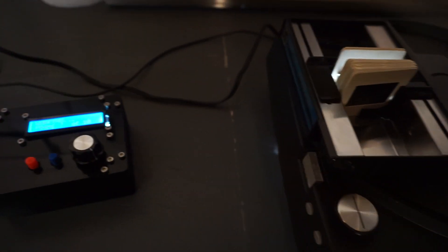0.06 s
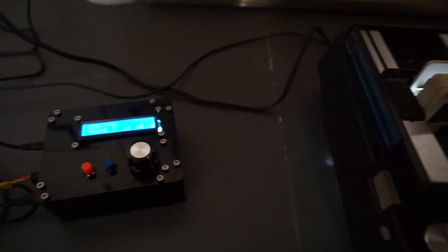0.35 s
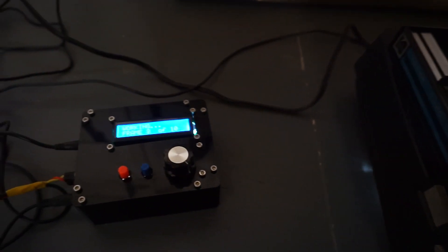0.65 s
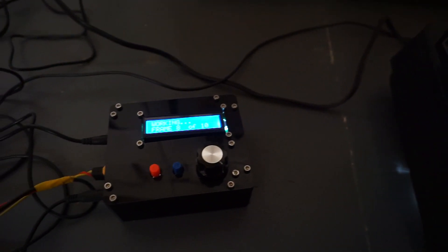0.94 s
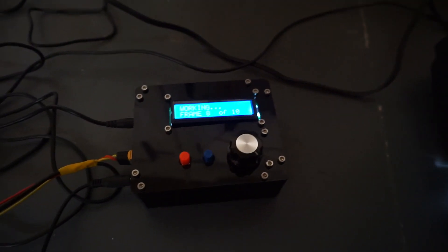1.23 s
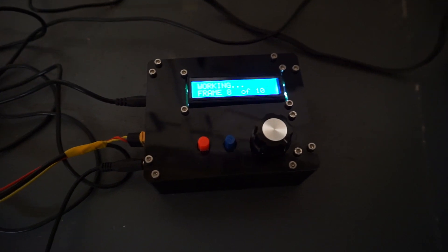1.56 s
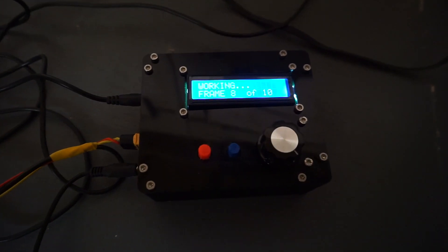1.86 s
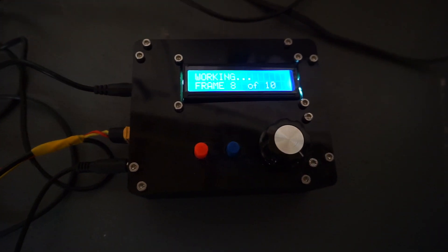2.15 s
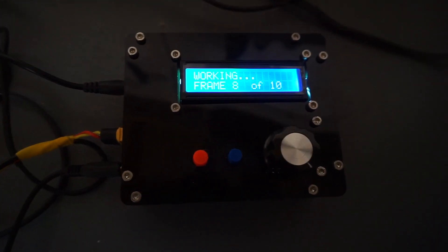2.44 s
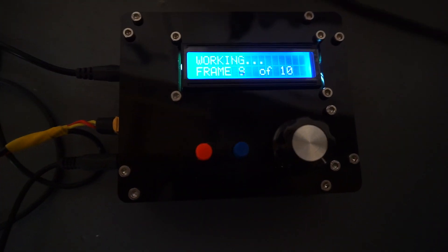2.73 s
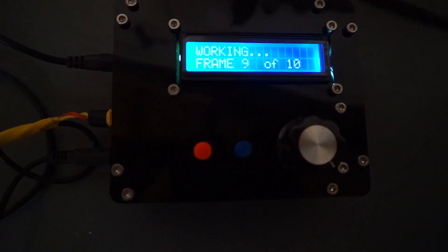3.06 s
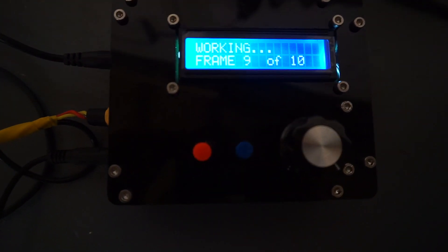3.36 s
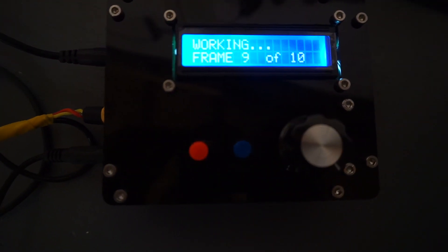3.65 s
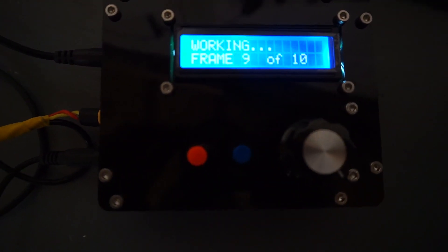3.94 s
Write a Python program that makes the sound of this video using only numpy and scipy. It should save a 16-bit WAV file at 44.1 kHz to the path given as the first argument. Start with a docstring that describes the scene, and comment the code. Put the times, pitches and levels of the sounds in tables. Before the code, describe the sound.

Sharp mechanical clicks from a camera and slide projector in a small room. The shutter fires and winds briefly, then the changer clunks, slides and snaps. The cycle happens twice, slightly to the right, over a steady fan hum.

```python
"""Slide copier, two cycles

On a table in a small room, a camera fires: mirror, shutter, winding motor. Then the projector's
changer clunks, slides and latches, over the hum of its fan. Hits are noise bursts ringing each part;
moving parts are gritty friction. The microphone drifts left of both machines, and its gain control
ducks after the hardest snaps."""
import sys
import numpy as np
from scipy import signal
from scipy.fft import rfft, irfft
from scipy.io import wavfile
from scipy.ndimage import uniform_filter1d

SR = 44100
rng = np.random.default_rng(int(sys.argv[2]) if len(sys.argv) > 2 else 0)


def to_wav(s):
    """Save 16-bit WAV."""
    ch = np.atleast_2d(s).T  # columns
    pcm = np.round(np.clip(ch, -1, 1) * 32767)  # PCM
    wavfile.write(sys.argv[1], SR, pcm.astype(np.int16))


N = 176400
TIME = np.arange(N) / SR
BAND_EDGES_HZ = np.geomspace(22, 12500, 29)
BAND_HZ = np.sqrt(BAND_EDGES_HZ[1:] * BAND_EDGES_HZ[:-1])

# The hits. Each row: start in seconds, level in dB, rise in seconds, t60 at 3 kHz in seconds,
# brightness in dB per octave.
MIRROR_CLICKS = [(0.4407, -19, 0.0027, 0.015, 0.5), (0.456, -28, 0.0017, 0.037, 2),
                 (2.6982, -19.5, .002, 0.022, -2.5), (2.713, -24.5, 0.0025, 0.031, -2.5)]   # the mirror is released and flips up
LATCH_CLICKS = [(.532, -24.5, 0.003, 0.043, -1.5), (0.686, -21, 0.0036, 0.058, 2.5),
                (0.7109, -17, 0.0027, 0.03, 0), (2.7687, -21.5, 0.0019, 0.028, -2.8),
                (2.9253, -21, .003, 0.051, 2), (2.949, -18, 0.0029, 0.025, 1)]   # the shutter closes; the winder ends on a double latch
DRIVE_CLUNKS = [(0.962, -25.5, 0.0069, 0.17, 0.5), (0.974, -21.5, 0.0075, 0.0094, -3.5),
                (0.979, -17.5, 0.0062, 0.069, 2.5), (1.0, -33, 0.0099, 0.036, -3),
                (3.22, -24, 0.0072, 0.15, -1), (3.233, -18.5, 0.0093, 0.096, 2),
                (3.258, -40, 0.0081, .08, -7.5)]   # the changer's drive engages and shakes the housing
CATCH_SNAPS = [(.953, -19.5, 0.0024, 0.024, 3.5), (1.407, -25, 0.0018, 0.047, 7),
               (1.435, -30, 0.0018, 0.036, -1), (1.484, -6.5, 0.0024, 0.028, 3.5),
               (1.4927, -13.5, 0.0044, 0.062, 2.5), (1.7876, -12, 0.0034, 0.062, -2),
               (2.42, -30, 0.0018, 0.014, -5.5), (3.209, -17.5, 0.0028, 0.023, 3.5),
               (3.658, -31.5, 0.0013, 0.037, 5), (3.668, -35.5, 0.0037, 0.093, -2),
               (3.74, -6.5, 0.0021, 0.017, 3.5), (3.751, -14, .004, 0.07, -.5)]   # steel catches snap
CARRIER_KNOCKS = [(1.088, -24.5, 0.0054, 0.038, 2.5), (1.216, -34.5, 0.0036, 0.068, 2.5),
                  (1.249, -26, 0.011, 0.049, 1.5), (1.392, -30, 0.0032, 0.02, 0),
                  (1.5698, -16.5, 0.0013, 0.036, 1.5), (1.575, -20, 0.0037, 0.084, 4),
                  (1.8, -18.5, 0.0069, 0.026, 0.5), (1.8762, -20.5, 0.0018, 0.066, -0.5),
                  (1.896, -40, 0.0065, .12, 1), (1.924, -32.5, 0.0032, 0.04, -3),
                  (3.33, -32.5, 0.0027, 0.035, -2), (3.343, -26, 0.009, 0.027, 0.5),
                  (3.466, -34.5, 0.0033, 0.078, 3.5), (3.509, -26, 0.0042, 0.035, 3.5),
                  (3.516, -32.5, 0.0032, 0.044, -2), (3.6965, -21.5, 0.00099, 0.023, -0.9),
                  (3.825, -18.5, 0.003, 0.062, 2), (3.833, -24, 0.0024, 0.11, 2.5)]   # slide mounts and the carrier arm hit their stops
# The mirror's landings. Each row: start in seconds, level in dB.
MIRROR_THUMPS = [(0.441, -25.5), (.459, -20), (2.7, -22.5), (2.7162, -20)]
# The camera body's modes. Each row: pitch in Hz, relative level in dB, t60 in seconds.
BODY_MODES = [(243, -24, 0.065), (448, -2, 0.033), (488, -0.5, 0.03), (600, 6.5, 0.034), (765, -7, 0.044)]
# Parts on the move. Each row: start in seconds, end in seconds, level in dB.
WINDER_RUNS = [(0.556, 0.712, -41), (2.802, 2.918, -40.5)]
GEAR_RUBS = [(1.06, 1.94, -49), (1.405, 1.523, -43.5), (3.324, 4.05, -46.5), (3.433, 3.47, -43.5),
             (3.665, 3.74, -43)]   # the changer's gears and arm

# Each part's tone colour. Each row: frequency in Hz, relative noise density in dB.
MIRROR_COLOUR = [(240, -40), (400, -1), (1400, 3), (2200, -5), (3000, 3.5), (5300, 3.5), (6700, -2.5),
                 (8000, 5), (11000, -1.5)]
LATCH_COLOUR = [(240, -31), (600, -15), (1300, 8), (2700, 3.5), (5200, 1), (8800, 0.5), (11000, -6.5)]
WINDER_COLOUR = [(500, -10), (1500, 15), (3000, 9.5), (5500, 9), (11000, 4.5)]
HOUSING_COLOUR = [(35, -55), (60, -35), (400, 2), (580, 3.5), (760, -3), (1000, 0.5), (1500, 5.5),
                  (2910, -3.5), (6380, -3.5), (11000, -11)]
CATCH_COLOUR = [(260, -59), (500, -17), (1070, -38), (1190, -5), (1710, 9), (2630, 3), (3930, 8),
                (11000, -1)]
CARRIER_COLOUR = [(240, -31), (400, -1), (1000, -1.5), (1390, 0.5), (2640, 1), (3200, -20.5), (3780, 1.5),
                  (6060, -10), (11000, -15)]
GEAR_COLOUR = [(400, -7), (1300, 13), (2500, 15), (5000, 5.5), (11000, -8)]
AIR_COLOUR = [(25, -38), (173, -14), (229, -2.5), (303, -14), (433, -2), (573, -9), (635, 12), (685, -2),
              (759, -1), (954, -6), (1080, 0), (1200, -10.5), (1360, -12), (1510, -9), (2640, -13),
              (2930, -18.5), (3410, -21), (4630, -25.5), (6780, -28.5), (11000, -32.5)]
# Where each part rings. Each row: pitch in Hz, width in Hz, strength in dB.
MIRROR_RINGS = [(1390, 100, 3.6), (2900, 350, 6.3), (4120, 190, 2.4), (5630, 310, 3), (7900, 250, 2),
                (10540, 520, 8.4)]
LATCH_RINGS = [(820, 53, 4.3), (2170, 60, 1.7), (3040, 114, 6.1), (4070, 140, 3.1), (6180, 260, 5.5),
               (7020, 33, 2.9), (7760, 120, 3.1), (8440, 89, 5.7), (10160, 280, 3.3)]
WINDER_RINGS = [(3060, 300, -2), (8300, 180, -1)]
HOUSING_RINGS = [(760, 200, 5.1), (1095, 39, 5.3), (1412, 35, 8.4), (2023, 71, 0.5), (6400, 87, 4)]
CATCH_RINGS = [(4700, 87, 1), (6400, 130, 1)]
CARRIER_RINGS = [(1334, 31, 8.5), (3140, 69, 8.5)]
GEAR_RINGS = [(4700, 170, 2), (6860, 140, 5), (8320, 180, 1), (9600, 210, 3.5)]

# The fan's hum. Each row: pitch in Hz, opening level in dB, change in dB per second as the
# microphone moves, width in Hz.
FAN_TONES = [(225.3, -50, -1.5, 4.5), (240.2, -54, -0.5, 2.4), (439.8, -61, 3, 79), (811, -51, -1, 33),
             (1002, -55, 0.65, 4.3), (1040, -50, -0.44, 4.6), (1109, -52.5, -3.5, 2), (1353, -50, -2.5, 31),
             (1762, -60, 1, 31), (3350, -64, 1.5, 41)]
# Level rides on the fan's air. Each row: time in seconds, gain in dB.
AIR_RIDE = [(0, -38.5), (1.4, -37), (2.1, -37.5), (2.6, -38), (3.15, -37), (3.6, -37), (4, -37.5)]   # all of it, as the microphone moves
HISS_RIDE = [(0, 1), (1.6, 0.5), (2.3, -1), (3.1, -2), (3.6, -3.5)]   # extra gain on its treble

# Where the hits' treble sits. Each row: time in seconds, left minus right in dB.
CAMERA_PAN = [(.44, -0.5), (.71, -2.5), (2.7, -5), (2.95, -5.5)]
PROJECTOR_PAN = [(.95, -6), (1.6, -8), (3.2, -9), (3.8, -8)]
# Where the fan sits. Each row: frequency in Hz, left minus right in dB.
FAN_PAN = [(100, 1), (350, -2), (620, -2.5), (1120, -6), (2010, -9.5), (3620, -9), (9000, -6)]
# Stereo focus of the noise. Each row: frequency in Hz, left-right correlation (1 is mono).
MECHANISM_FOCUS = [(300, .99), (700, 1), (1300, 0.43), (3000, 0.84), (9000, 0.23)]
FAN_FOCUS = [(60, 0.95), (250, 1), (600, 1), (1200, 0.5), (2600, 0), (6000, 0.14)]


def slide_changer(bands):
    """The drive shakes loose parts in the housing, catches snap, the carrier knocks and gears rub."""
    return (hits(bands, DRIVE_CLUNKS, HOUSING_COLOUR, HOUSING_RINGS, PROJECTOR_PAN, rattle_db=3)
            + hits(bands, CATCH_SNAPS, CATCH_COLOUR, CATCH_RINGS, PROJECTOR_PAN)
            + hits(bands, CARRIER_KNOCKS, CARRIER_COLOUR, CARRIER_RINGS, PROJECTOR_PAN)
            + friction(bands, GEAR_RUBS, GEAR_COLOUR, GEAR_RINGS,
                       pan_db=-7.5, ticks_per_s=57, tick_db=13.5, fade_s=0.0093))


def camera(bands):
    """The mirror flips and lands, the shutter closes, the winder whirrs and latches."""
    return (hits(bands, MIRROR_CLICKS, MIRROR_COLOUR, MIRROR_RINGS, CAMERA_PAN)
            + hits(bands, LATCH_CLICKS, LATCH_COLOUR, LATCH_RINGS, CAMERA_PAN)
            + mirror_thumps(contact_s=0.0081)
            + friction(bands, WINDER_RUNS, WINDER_COLOUR, WINDER_RINGS,
                       pan_db=-3.5, ticks_per_s=150, tick_db=8.5, fade_s=0.11))


def hits(bands, rows, colour, rings, pan, rattle_db=0, chatter_db=1.8, shadow_hz=704):
    """Bursts of chattering contact that die fastest in the treble and set the part ringing."""
    out = np.zeros((2, N))
    flutter_db = chatter_db * drift(rate_hz=700) + rattle_db * np.tanh(drift(rate_hz=460))
    chatter = rms_one(from_db(flutter_db))
    for start, db, rise, t60, tilt in rows:
        onset = int(start * SR)
        span = slice(onset, min(N, onset + SR // 6))
        t = TIME[span] - TIME[onset]
        attack = from_db(db) * np.minimum(t / rise, 1) * chatter[span]
        pan_db = at_time(pan, start)
        for band, hz, gain in zip(bands, BAND_HZ, band_gains(colour, tilt)):
            band_t60 = t60 * (3000 / hz) ** 0.24
            decay = from_db(-60 * np.maximum(t - rise, 0) / band_t60)
            sides = pan_gains(pan_db * hz / np.hypot(hz, shadow_hz))   # bass stays near the centre
            out[:, span] += gain * attack * decay * band[:, span] * sides
    return resonate(out, rings)


def mirror_thumps(contact_s):
    """The mirror lands on its soft pad and the camera body rings briefly."""
    out = np.zeros((2, N))
    t = TIME[:SR // 5]
    ring = sum(from_db(db - 60 * t / t60) * np.sin(2 * np.pi * hz * t) for hz, db, t60 in BODY_MODES)
    thump = ring * np.minimum(t / contact_s, 1)
    for start, db in MIRROR_THUMPS:
        onset = int(start * SR)
        out[:, onset:onset + len(t)] += from_db(db) * thump * pan_gains(at_time(CAMERA_PAN, start) / 2)
    return out


def friction(bands, rows, colour, rings, pan_db, ticks_per_s, tick_db, fade_s, tick_s=0.00098):
    """Gears and sliding parts: rubbing and gritty ticks excite resonances that shift with the contact."""
    level = sum(from_db(db) * np.clip(np.minimum(TIME - start, end - TIME) / fade_s + .5, 0, 1)
                for start, end, db in rows)
    ticks = (rng.random(N) < ticks_per_s / SR) * rng.random(N)
    tick_tails = signal.lfilter([1], [1, -np.exp(-1 / (tick_s * SR))], ticks + 1e-18)
    grit = rms_one(np.sqrt(1 + from_db(tick_db) ** 2 * tick_tails))
    rub = np.tensordot(band_gains(colour), bands, 1)
    return resonate(level * grit * rub, rings, shift_db=11.5) * pan_gains(pan_db)


def resonate(x, rings, shift_db=0):
    """Add a part's two-pole resonances at constant power; shift_db lets their strengths wander."""
    rung = x
    for hz, width, db in rings:
        wander_db = shift_db * np.tanh(drift(rate_hz=14)) if shift_db else 0
        radius = np.exp(-np.pi * width / SR)
        feed = np.array([1, 0, -1]) * (1 - radius ** 2) / 2
        feedback = [1, -2 * radius * np.cos(2 * np.pi * hz / SR), radius ** 2]
        rung = rung + from_db(db + wander_db) * signal.lfilter(feed, feedback, x + 1e-18)
    return rung * np.std(x) / np.std(rung)


def fan(waver_depth, hiss_hz):
    """A bed of rushing air with the wavering tones of motor and blades."""
    air, hum = 0, 0
    hiss_db = at_time(HISS_RIDE, TIME)
    for band, hz, gain in zip(noise_bands(FAN_FOCUS), BAND_HZ, band_gains(AIR_COLOUR)):
        hiss_share = np.exp(-2 * np.log2(hz / hiss_hz) ** 2)   # a bell about an octave wide
        air += gain * from_db(hiss_share * hiss_db) * band * pan_gains(at_hz(FAN_PAN, hz))
    for hz, db, db_per_s, width in FAN_TONES:
        waver = 1 + waver_depth * np.sqrt(width / 2) * (drift(width / 2) + 1j * drift(width / 2))
        tone = rms_one(np.real(waver * np.exp(2j * np.pi * hz * TIME)))
        hum += from_db(db + db_per_s * TIME) * tone * pan_gains(at_hz(FAN_PAN, hz))
    return air * from_db(at_time(AIR_RIDE, TIME)) + hum


def room(x, t60_s, build_s, wet_db, wall_hz):
    """A short diffuse tail, different on each side and dulled by the walls."""
    t = TIME[:SR // 2]
    tail = rng.standard_normal((2, len(t))) * (1 - np.exp(-t / build_s)) * from_db(-60 * t / t60_s)
    tail /= np.linalg.norm(tail, axis=1, keepdims=True)
    wet = signal.fftconvolve(x, tail, axes=1)[:, :N]
    pole = np.exp(-2 * np.pi * wall_hz / SR)
    return from_db(wet_db) * signal.lfilter([1 - pole], [1, -pole], wet)


def noise_bands(focus):
    """Third-octave bands of stereo noise, each of unit power: bands x 2 x N."""
    white, bands = rng.standard_normal((2, 2, N)), []
    for k, hz in enumerate(BAND_HZ):
        bandpass = signal.butter(2, BAND_EDGES_HZ[k:k + 2], "band", fs=SR, output="sos")
        mid, side = signal.sosfilt(bandpass, white[k % 2])
        alike = at_hz(focus, hz)
        bands.append(rms_one(np.sqrt(1 + alike) * mid + np.sqrt(1 - alike) * side * [[1], [-1]]))
    return np.array(bands)


def band_gains(colour, tilt_db=0):
    """A tone colour as band gains with total power 1."""
    gains = from_db(at_hz(colour, BAND_HZ) + tilt_db * np.log2(BAND_HZ)) * np.sqrt(BAND_HZ)
    return gains / np.linalg.norm(gains)


def drift(rate_hz):
    """Smooth random modulation of unit power."""
    hz = np.arange(N // 2 + 1) * SR / N
    return rms_one(irfft(rfft(rng.standard_normal(N)) / (1 + (hz / rate_hz) ** 2), N))


def pan_gains(pan_db):
    """Left and right gains of constant power."""
    gains = from_db([pan_db / 2, -pan_db / 2])
    return (gains / np.sqrt(np.mean(gains ** 2, axis=0))).reshape(2, -1)


def at_hz(curve, hz):
    """Read a curve on a log-frequency axis."""
    points_hz, values = np.transpose(curve)
    return np.interp(np.log(hz), np.log(points_hz), values)


def at_time(curve, seconds):
    """Read an automation curve."""
    return np.interp(seconds, *np.transpose(curve))


def from_db(db):
    """Decibels to gain."""
    return 10 ** (np.asarray(db) / 20)


def rms_one(x):
    """Scale to unit power."""
    return x / np.sqrt(np.mean(x ** 2) + 1e-20)


def scene():
    """Camera and slide changer in the room, over the fan."""
    bands = noise_bands(MECHANISM_FOCUS)
    shots = camera(bands)
    changes = slide_changer(bands)
    left, right = changes + fan(waver_depth=0.36, hiss_hz=7440)
    projector = np.array([np.interp(TIME - 4 / SR, TIME, left), right])   # left is 4 samples late
    reverb = room(shots + changes, t60_s=0.27, build_s=0.0025, wet_db=-12.5, wall_hz=11300)
    return shots + projector + reverb


def record(dry, limit_db=-17, release_db_per_s=50, cutoff_hz=11000):
    """A fast limiter with a slow release ducks after the hardest snaps; then the top is cut."""
    power = uniform_filter1d(np.mean(dry ** 2, axis=0), size=66)
    over_db = np.maximum(10 * np.log10(np.maximum(power, 1e-12)) - limit_db, 0)
    release_db = release_db_per_s * TIME
    duck_db = np.maximum.accumulate(over_db + release_db) - release_db
    limited = dry * from_db(-uniform_filter1d(duck_db, size=22))
    return signal.sosfilt(signal.ellip(10, .3, 70, cutoff_hz, fs=SR, output="sos"), limited)


dry = scene()
out = record(dry)
to_wav(out)
```